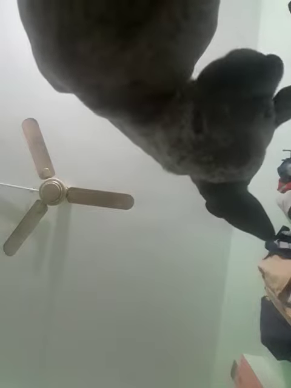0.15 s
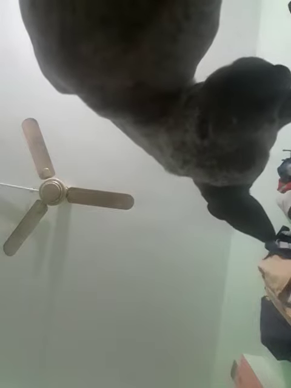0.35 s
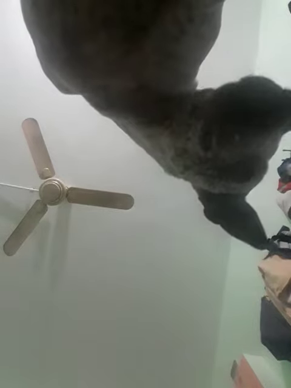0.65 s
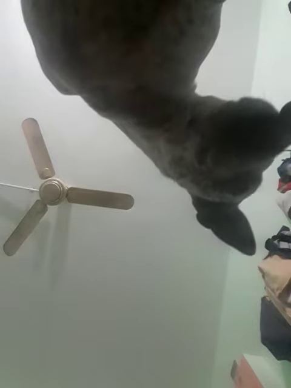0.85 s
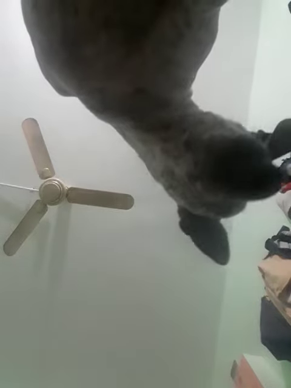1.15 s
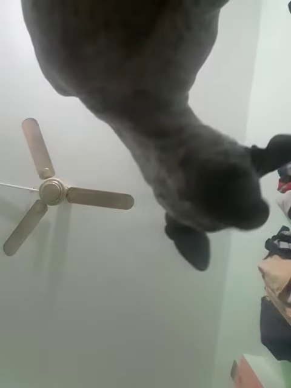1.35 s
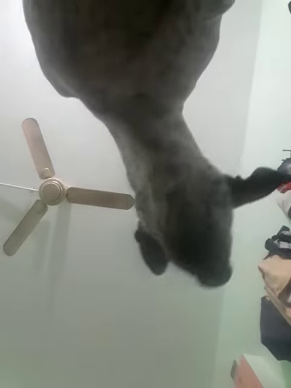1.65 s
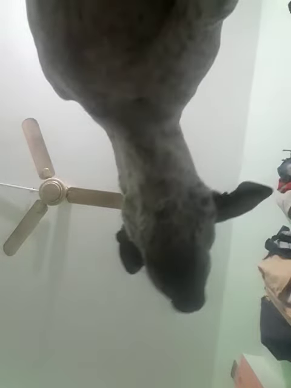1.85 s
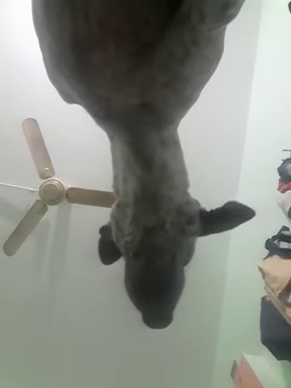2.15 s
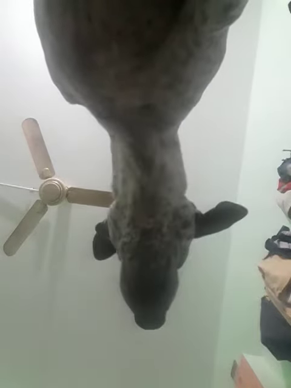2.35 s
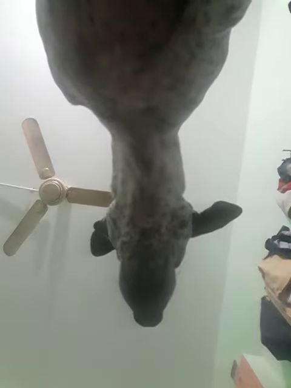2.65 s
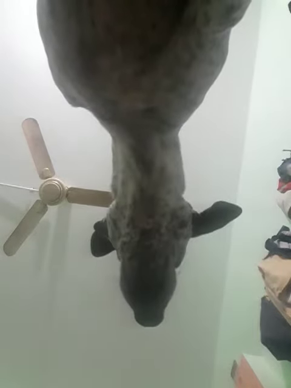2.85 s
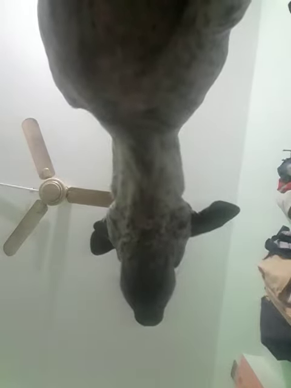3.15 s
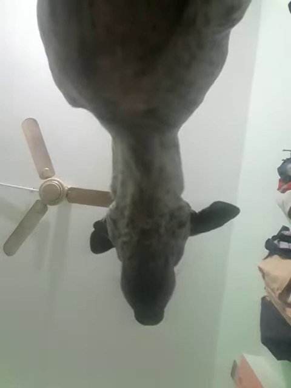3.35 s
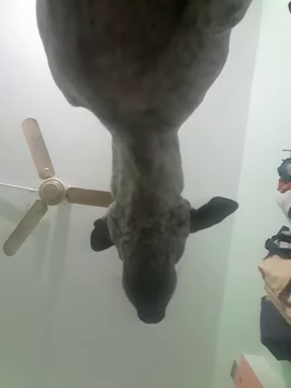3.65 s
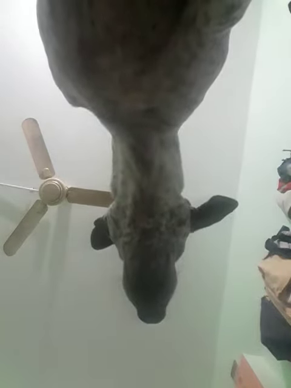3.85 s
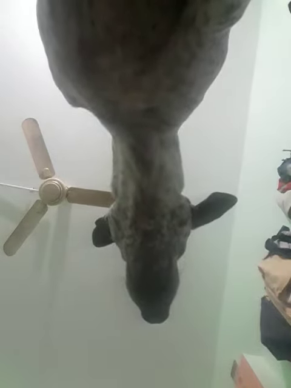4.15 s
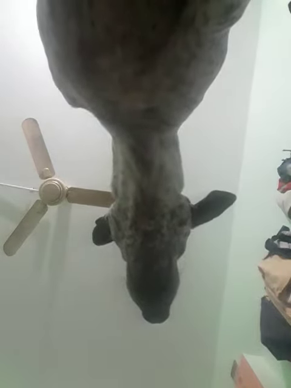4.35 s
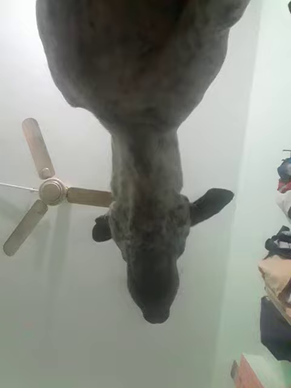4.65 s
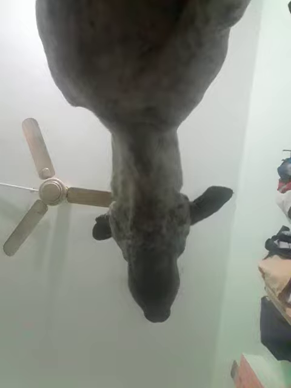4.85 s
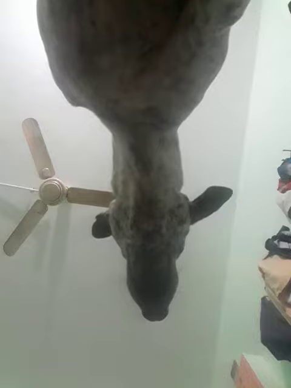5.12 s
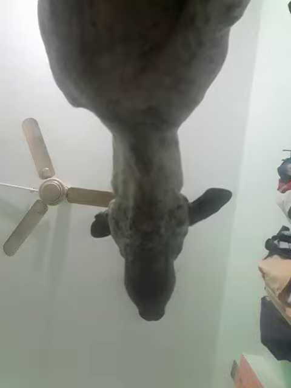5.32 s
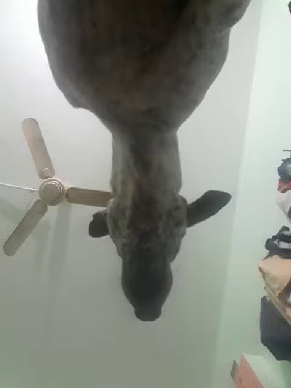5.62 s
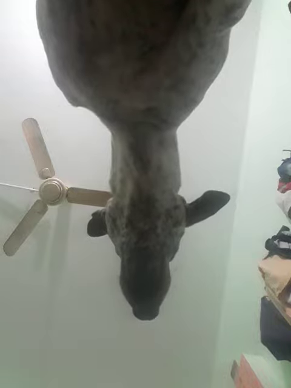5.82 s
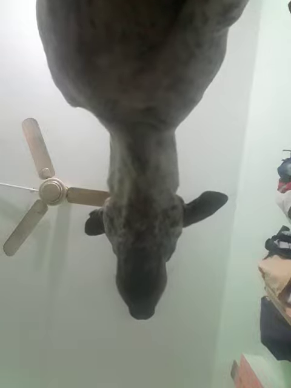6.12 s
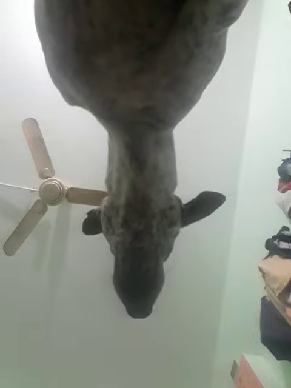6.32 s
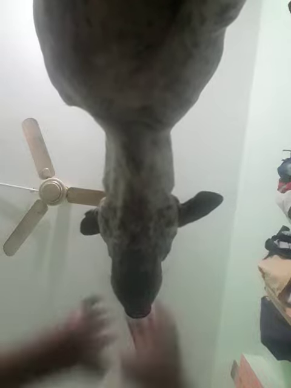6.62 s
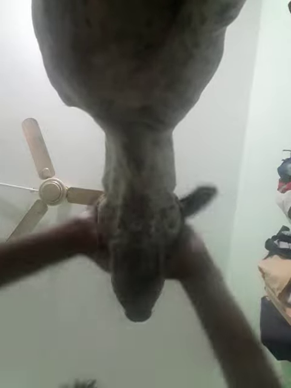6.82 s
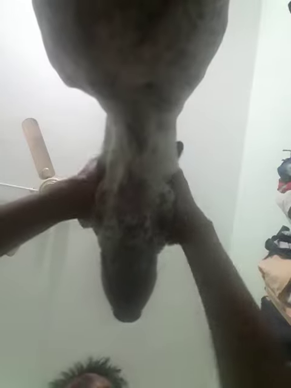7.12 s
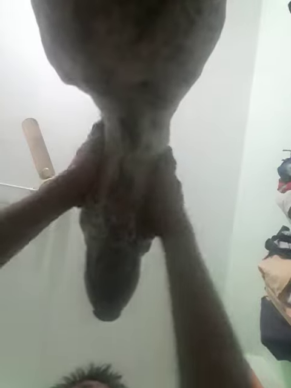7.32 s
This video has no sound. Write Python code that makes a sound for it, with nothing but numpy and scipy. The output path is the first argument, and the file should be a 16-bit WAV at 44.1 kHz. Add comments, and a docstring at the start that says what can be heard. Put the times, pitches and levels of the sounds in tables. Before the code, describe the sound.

In a bare room with a soft fan hum, joints pop and crack, something knocks distantly, and two palms rub fast before settling on fur.

```python
"""Knuckles crack, something thumps farther off, then two dry palms rub briskly and settle on a dog's short fur.
We listen close to a phone lying under the dog, in a bare room with a humming ceiling fan.
Cracks, ticks, pops and pats are short shaped pulses; rubbing and sliding are noise that swells with speed;
fuzzy gliding notes come from the hollow between the hands; the thump is a knock with fading tones and noise.
The room answers the hands with a ringing of noise that dies at its own speed for each frequency."""
import sys
import numpy as np
from scipy import signal
from scipy.fft import rfft, irfft, next_fast_len
from scipy.io import wavfile
from scipy.ndimage import uniform_filter1d, map_coordinates

SR = 44100
rng = np.random.default_rng(int(sys.argv[2]) if len(sys.argv) > 2 else 0)


def to_wav(sig):
    """Store sig (one row per channel, or 1-D mono) as 16-bit WAV at the path in sys.argv[1].

    Samples outside -1..1 are clipped; the rate is SR.
    """
    pcm = np.clip(np.atleast_2d(sig), -1, 1) * 32767
    pcm = np.round(pcm).astype(np.int16)
    wavfile.write(sys.argv[1], SR, pcm.T)  # frames by channels


N = 329868

# Steady tones of the fan. Each row: frequency in Hz, rms level in dB before it flutters.
FAN_TONES = [(58.5, -90), (81, -82), (101, -76), (199.5, -83.5), (296, -88), (314, -87.5), (565, -98)]
# Colour of the fan's air. Each row: frequency in Hz, relative level in dB.
FAN_AIR_COLOUR = [(25, -25.5), (45, -17), (65, -5), (95, -2.5), (125, -2.5), (160, -9), (290, -14),
                  (380, -18.5), (650, -21), (1000, -25.5), (3000, -32)]
# Colour of the microphone's own hiss. Each row: frequency in Hz, relative level in dB.
MIC_HISS_COLOUR = [(300, -16), (1200, 0.5), (5000, 0.5), (6200, 0.5), (6850, 13.5), (7250, 17), (7800, 8.5),
                   (9000, 5.5), (11000, 0), (15500, -1.5)]
# Colour of the air noise that differs between the channels. Each row: frequency in Hz, relative level in dB.
SIDE_AIR_COLOUR = [(25, -4), (90, -5.5), (200, -11), (500, -12.5), (1500, -19.5), (7000, -16),
                   (15000, -24.5)]
TOP_HZ = 15900  # nothing is kept above about this frequency

# How long the room rings. Each row: frequency in Hz, time to fall by 60 dB in seconds.
ROOM_FADE = [(150, .7), (400, 0.4), (900, 0.4), (2000, 0.4), (5000, 0.44), (9000, 0.44), (15000, 0.12)]
# Colour of the room's answer. Each row: frequency in Hz, relative level in dB.
ROOM_ANSWER_COLOUR = [(150, 4.5), (1000, 6), (3000, -1.5), (8000, -3), (15000, 0)]

# Soft distant scuffs. Each row: start in seconds, level in dB, centre frequency in Hz.
DISTANT_SCUFFS = [(0.282, -72.5, 440), (3.505, -78, 2620), (4.005, -59, 3500), (4.396, -67, 2890)]

THUMP_S = 3.9235  # start of the thump in seconds
# Tones of the thump. Each row: frequency in Hz, relative level in dB,
# time to fall by 60 dB in seconds before stretching.
THUMP_TONES = [(275, 3.5, 0.85), (504, 7, 0.56), (774, -3, 0.43), (740, -11, 0.27), (1114, -11, 0.35),
               (1430, -17, 0.33), (1615, -9, 0.63), (1696, -15, 0.24), (1879, -14, 0.17), (2200, -3, 0.41)]
# Colour of the thump's knock and noise. Each row: frequency in Hz, relative level in dB.
THUMP_COLOUR = [(60, -34), (120, -10), (190, -4), (280, 8), (380, -4), (520, 6.5), (680, -5.5),
                (1200, -7.5), (1650, -5), (2200, -8.5), (3300, -13.5), (5000, -18.5), (8000, -18),
                (15000, -31)]
# Loose parts ringing on. Each row: centre in Hz, width in Hz before widening, level in dB.
LOOSE_PARTS = [(1634, 92, -24.5), (2180, 89, -29), (3270, 300, -25)]

# Colour of skin friction. Each row: frequency in Hz, relative level in dB.
SKIN_COLOUR = [(70, 6.5), (160, -1.5), (300, -12), (450, -7), (1000, -12), (2800, -3.5), (4400, -4),
               (6500, 0.5), (8500, 2), (10000, -2), (12500, -0.5), (15500, -6.5)]
# Single slides and brushes. Each row: middle in seconds, half of the whole swell in seconds,
# level in dB at full speed, lower edge in Hz before a small shift down, brightness in dB per octave above it.
SINGLE_SLIDES = [(.0, 0.26, -62.5, 890, -3), (.2, .46, -67.5, 3000, -.5), (0.509, 0.13, -65, 1600, -3.5),
                 (.548, .085, -57.5, 4140, -7), (1.125, .28, -66, 6400, -5), (1.55, .052, -66.5, 1200, -6),
                 (1.677, .13, -53.5, 2000, -3.5), (2.86, .23, -56, 2900, -.8),
                 (3.05, .02, -49.5, 2400, -16), (4.028, .055, -44.5, 3020, -0.5),
                 (4.095, .21, -57.5, 4040, -4), (5.06, .17, -61.5, 6800, 0),
                 (5.197, 0.098, -50.5, 4000, 5.5), (6.416, .073, -47, 2010, -1.5),
                 (7.388, .3, -62, 3600, -2)]
# Air squeezed out between gripping fingers. Each row: middle in seconds, half of the whole swell in seconds,
# level in dB, middle note in Hz, glide in octaves from the middle to either end.
FINGER_SQUEAKS = [(.74, .12, -76, 1900, .45), (2.822, .1, -66, 3250, .1), (2.94, .04, -63.5, 3300, -.1)]

POP_S = 1.221  # start of the hollow pop in seconds
# Rings of the pocket between cupped hands. Each row: centre in Hz, width in Hz before narrowing, level in dB.
POP_RINGS = [(827, 140, 2), (376.5, 640, -10.5), (2220, 400, -13.5), (4540, 1400, -9.5),
             (6840, 3100, -15.5), (9000, 900, -8.5), (12300, 3500, -24), (1420, 570, -20)]

# Colour of the bare snap of a contact. Each row: frequency in Hz, relative level in dB.
SNAP_COLOUR = [(100, -3), (300, -9), (750, -7.5), (1200, -1), (2200, -0.5), (5000, 0.5), (8500, -2),
               (11000, -5), (15500, -3)]
# Joint cracks and small ticks of contact. Each row: start in seconds, level in dB, ring in Hz,
# ring width in Hz, upper ring in dB, snap in dB, lower edge in Hz, upper edge in Hz, room answer in dB.
CRACKS_AND_TICKS = [(1.645, -17, 4270, 1498, -12, -6, 1000, 9000, -1),
                    (1.659, -10, 2120, 1200, -14.5, -5.5, 950, 7500, -8.5),
                    (1.7384, 0, 3600, 700, -20.5, -7.5, 880, 10000, -6),
                    (1.7655, 18, 3330, 480, -17, -19.5, 440, 10000, -10.5),
                    (1.8028, 15, 3840, 900, -6.5, -14, 221, 10200, -6.5),
                    (1.8175, 17, 3960, 634, -12.5, -21, 199.3, 7000, -25),
                    (1.924, 11, 4420, 900, -1.5, -9.5, 252, 9000, -8.5),
                    (2.574, -16.5, 8700, 1400, -12, -19, 700, 14100, -5),
                    (2.789, -18.5, 3340, 899, 8, -8, 2674, 13800, -13),
                    (2.887, 6.5, 8800, 800, -15, -26, 2600, 15000, -13),
                    (2.9658, 4.5, 1750, 1200, -25, -14, 1100, 17000, -6),
                    (3.091, -10.5, 2920, 900, -14, -4.5, 1088, 8500, -4),
                    (3.1224, -8.5, 2900, 897, -14.5, -4.5, 1060, 8200, -7),
                    (3.1595, -5, 6200, 1300, -14, -4, 960, 12000, 2),
                    (3.1619, 4.5, 3040, 704, 2.5, 1, 1135, 17130, -5.5),
                    (5.1405, -23, 6800, 2500, -5, -7, 1000, 17000, -1),
                    (7.063, -19, 4600, 2500, 3, -15, 400, 12000, -4.5)]
UPPER_RING_HZ, UPPER_Q = 8430, 5  # the upper ring that all cracks and ticks share, and its sharpness

# The palms bump as they pass. Each row: start in seconds, level in dB, ring of the hollow in Hz.
PALM_PATS = [(5.372, -13, 1190), (5.402, -10, 2600), (5.505, -7, 2080), (5.609, -16.5, 910),
             (5.64, -16, 400), (5.6611, -5.5, 990), (5.734, -9, 695), (5.89, -11, 1590),
             (5.895, -13.5, 536), (6.142, -12.5, 1500)]
PAT_Q, PAT_TOP_HZ = 3.2, 8240  # sharpness of the hollow's ring; upper edge of a pat
FLESH_HZ, FLESH_WIDTH_HZ, FLESH_DB = 262, 570, -11.5  # the dull push of the flesh

# To-and-fro of the palms. Each row: middle in seconds, half of the whole swell in seconds, level in dB,
# brightness in dB per octave, opening note in Hz, its glide in octaves from the middle to either end,
# opening note in dB and closing note in dB, both relative to the level.
PALM_STROKES = [(5.254, 0.13, -43, -1.7, 1600, -0.36, -20, -7),
                (5.376, .108, -34.5, -2.5, 2350, .75, -8.5, -18),
                (5.5, .1, -32, -0.5, 1480, -.45, -16, -12),
                (5.613, .125, -32.5, -.5, 2746, .15, -11, -11.5),
                (5.756, .125, -35, -3, 2650, 0.26, -22, -21),
                (5.867, .135, -34, -1.5, 2820, -.05, -12, -19),
                (6.002, .08, -30.5, 0, 3200, -0.1, -25, -27),
                (6.116, .087, -31.5, -.5, 3150, -0.12, -14, -20),
                (6.251, 0.13, -35.5, -2, 2300, -.25, -20, -20), (6.361, .095, -36, -.6, 2600, .3, -11, -22)]
PALM_EDGE_HZ, EDGE_FOLLOWS = 2400, 0.49  # reference edge of the hiss; how far the edge follows the opening note
NOTE_LEAD_S, NOTE_HALF_S = .016, .038  # opening note comes this early; half the span of either note
CLOSING_LAG_S, CLOSING_HZ, CLOSING_GLIDE_OCT = .027, 3200, .55  # the shrinking hollow chirps upward


def amp(db):
    """Turn dB into a gain."""
    return 10 ** (np.asarray(db) / 20)


def unit(x):
    """Scale a sound to an average strength (rms) of 1."""
    return x / np.sqrt(np.mean(x ** 2) + 1e-20)


def along(points, hz):
    """Read a curve of (Hz, value) points, evenly by pitch."""
    f, v = np.transpose(points)
    return np.interp(np.log(hz + 1), np.log(f + 1), v)


def add(track, s, x):
    """Mix a sound into the track from second s on, cutting what falls outside."""
    i = round(s * SR)
    x = x[max(-i, 0):N - i]
    track[max(i, 0):][:len(x)] += x


def wobble(rate, size):
    """A smooth random curve with so many random points a second."""
    knots = rng.standard_normal(int(size * rate / SR) + 4)
    return map_coordinates(knots, [np.arange(size) * rate / SR])


def filtered(x, response):
    """Change the strength of each frequency by a given response."""
    m = next_fast_len(len(x) + 8192)
    return irfft(rfft(x, m) * response(np.fft.rfftfreq(m, 1 / SR)), m)[:len(x)]


def noise(spectrum, size):
    """Random hiss coloured by a table, at rms 1."""
    return unit(filtered(rng.standard_normal(size), lambda hz: amp(along(spectrum, hz))))


def resonance(hz, centre, width):
    """Power of one resonance: strongest at its centre, weaker to both sides."""
    return (hz * width) ** 2 / ((centre ** 2 - hz ** 2) ** 2 + (hz * width) ** 2)


def band(hz, low_hz, high_hz, leak_db=-27):
    """Gain of a contact: a steep, slightly leaky lower edge and a gentle upper one."""
    lower = amp(leak_db) + 1 / np.sqrt(1 + (low_hz / (hz + 1)) ** 12)
    return lower / np.sqrt(1 + (hz / high_hz) ** 6)


def dying(spectrum, t60s, size=SR):
    """Diffuse ringing of total energy 1, each frequency dying at its own speed."""
    hz, t, z = signal.stft(noise(spectrum, size), SR, nperseg=256)
    fade = amp(-60 * t / along(t60s, hz)[:, None])
    tail = signal.istft(z * fade, SR, nperseg=256)[1][:size]
    return tail / np.linalg.norm(tail)


def room(x, gap=0.006):
    """The bare walls answer after a short gap, in seconds."""
    tail = dying(ROOM_ANSWER_COLOUR, ROOM_FADE)
    fade_in = np.clip(np.arange(len(tail)) / (gap * SR) - .5, 0, 1)
    return signal.fftconvolve(x, tail * fade_in)


def impact(power, spread=0.0012, size=4096):
    """A pulse with the given power spectrum, scattered for a moment."""
    # folding the cepstrum packs the pulse's energy at its start
    cepstrum = irfft(np.log(power(np.fft.rfftfreq(size, 1 / SR)) + 1e-12) / 2)
    cepstrum[1:size // 2] *= 2
    cepstrum[size // 2:] = 0
    scatter = rfft(rng.standard_normal(size) * np.exp(-np.arange(size) / (spread * SR)))
    # even out the scatter so that it keeps the overall colour
    scatter /= np.sqrt(np.abs(uniform_filter1d(np.abs(scatter) ** 2, size=50)))
    return irfft(np.exp(rfft(cepstrum)) * scatter)[:size // 2]


def contact(start_s, pulse, room_db, bounce_db=-10, bounce_s=.0037):
    """A pulse in the room: the floor returns it almost at once, the walls later."""
    out = np.zeros(N)
    add(out, start_s, pulse)
    add(out, start_s + bounce_s, amp(bounce_db) * pulse)
    add(out, start_s, amp(room_db) * room(pulse))
    return out


def swell(length, sharpness):
    """Speed of one stroke over twice its length: a bell with soft skirts."""
    return np.exp(-np.abs(np.linspace(-3, 3, int(2 * length * SR))) ** sharpness)


def patchy(x, depth_db, across=8, along_time=9):
    """Changing contact tints the hiss with drifting patches of colour."""
    z = signal.stft(x, nperseg=256)[2]
    field = rng.standard_normal(z.shape)
    for _ in range(2):
        field = uniform_filter1d(field, round(across), axis=0)
        field = uniform_filter1d(field, round(along_time), axis=1)
    return signal.istft(z * amp(depth_db * unit(field)), nperseg=256)[1][:len(x)]


def friction(length, edge_hz, tilt_db, sharpness, catch_db=1.5, patchy_db=2, leak_db=-25):
    """Skin ridges catch and slip in a dense hiss that follows the speed of the hand."""
    speed = swell(length, sharpness)
    size = len(speed)
    uneven = rng.standard_normal(size) * amp(catch_db * wobble(160, size))
    slips = patchy(uneven, patchy_db)

    def colour(hz):
        low_cut = amp(leak_db) + hz ** 4 / (hz ** 4 + (.85 * edge_hz) ** 4)
        octaves_above = np.log2(np.maximum(hz, edge_hz) / edge_hz)
        return low_cut * amp(along(SKIN_COLOUR, hz) + tilt_db * octaves_above)

    return speed * unit(filtered(slips, colour))


def whistle(length, note_hz, glide_oct, width_hz=300, sharpness=2.7):
    """The hollow between the hands colours the escaping air with a gliding, fuzzy note."""
    flow = swell(length, sharpness)
    size = len(flow)
    pitch = note_hz * 2 ** (glide_oct * np.linspace(-1, 1, size))
    phase = 2 * np.pi * np.cumsum(pitch) / SR
    # two random strengths blur the pure tone
    return flow * unit(wobble(width_hz, size) * np.cos(phase) + wobble(width_hz, size) * np.sin(phase))


def fan(air_db=-73, waver=.35, flutter_db=3.0):
    """The ceiling fan hums unsteadily over the low rush of its blades."""
    t = np.arange(N) / SR
    hum = np.zeros(N)
    for hz, db in FAN_TONES:
        level = amp(db + flutter_db * wobble(5, N)) * np.sqrt(2)
        hum += level * np.sin(2 * np.pi * hz * t + waver * wobble(7.9, N))
    return hum + amp(air_db) * noise(FAN_AIR_COLOUR, N)


def microphone_hiss(hiss_db=-74, waver_db=-3.0):
    """The microphone's own hiss, slowly drifting in level."""
    return amp(hiss_db + waver_db * wobble(3.8, N)) * noise(MIC_HISS_COLOUR, N)


def scuffs(rise_s=0.0022, t60=0.45, q=1.55):
    """Soft scuffs farther off: bands of noise that swell quickly and fade with the room."""
    out, t = np.zeros(N), np.arange(SR) / SR
    for s, db, centre_hz in DISTANT_SCUFFS:
        hiss = unit(filtered(rng.standard_normal(SR), lambda hz: resonance(hz, centre_hz, centre_hz / q)))
        add(out, s, amp(db) * hiss * (1 - np.exp(-t / rise_s)) * amp(-60 * t / t60))
    return out


def thump(body_db=-10, modes_db=-15, knock_db=-22, waver=0.66, rise_s=0.0048, stretch=1.12, rattle_t60=0.81):
    """A distant blow on something wooden: a weak direct knock, then the room and a rattle that lingers."""
    out, t = np.zeros(N), np.arange(SR) / SR
    ring = np.zeros(SR)
    for hz, db, t60 in THUMP_TONES:
        fade = amp(db - 60 * t / (stretch * t60))
        ring += fade * np.sin(2 * np.pi * hz * t + waver * wobble(39.5, SR))
    ring /= np.linalg.norm(ring)
    # points of (Hz, time to fall by 60 dB in seconds)
    body = dying(THUMP_COLOUR, [(200, 1.0), (600, 0.73), (2000, 0.45), (10000, 1.0)])
    add(out, THUMP_S, (amp(modes_db) * ring + amp(body_db) * body) * (1 - np.exp(-t / rise_s)))
    knock = impact(lambda hz: amp(along(THUMP_COLOUR, hz)) ** 2)
    add(out, THUMP_S, amp(knock_db) * knock / np.linalg.norm(knock))
    for centre, width, db in LOOSE_PARTS:
        rattle = filtered(rng.standard_normal(SR), lambda hz: resonance(hz, centre, 1.6 * width))
        rattle *= amp(-60 * t / rattle_t60)
        add(out, THUMP_S, amp(db) * rattle / np.linalg.norm(rattle))
    return out


def sliding(sharpness=2.2):
    """Hands slide between the cracks and squeeze out air, something brushes after the thump,
    the last palm stroke trails off, and fur is stroked."""
    out = np.zeros(N)
    for s, length, db, edge_hz, tilt_db in SINGLE_SLIDES:
        add(out, s - length, amp(db) * friction(length, edge_hz, tilt_db, sharpness))
    for s, length, db, note_hz, glide_oct in FINGER_SQUEAKS:
        add(out, s - length, amp(db) * whistle(length, note_hz, glide_oct))
    return out


def pop(level_db=-1, room_db=-3.5, dull_hz=8000):
    """The air pocket between cupped hands rings briefly; mostly its low note carries into the room."""
    out = np.zeros(N)

    def power(hz):
        return sum(amp(db) ** 2 * resonance(hz, centre, 0.88 * width) ** 2 for centre, width, db in POP_RINGS)

    pulse = amp(level_db) * impact(power)
    add(out, POP_S, pulse)
    add(out, POP_S, amp(room_db) * filtered(room(pulse), lambda hz: 1 / (1 + (hz / dull_hz) ** 2)))
    return out


def cracks_and_ticks(spread=.0016):
    """Each crack or tick is a broad snap with two short rings: its own and a shared upper one."""
    out = np.zeros(N)
    for s, db, ring_hz, width_hz, upper_db, snap_db, low_hz, high_hz, room_db in CRACKS_AND_TICKS:
        def power(hz):
            own_ring = resonance(hz, ring_hz, width_hz) ** 2
            upper_ring = amp(upper_db) ** 2 * resonance(hz, UPPER_RING_HZ, UPPER_RING_HZ / UPPER_Q) ** 2
            snap = amp(snap_db + along(SNAP_COLOUR, hz)) ** 2
            return (own_ring + upper_ring + snap) * band(hz, low_hz, high_hz) ** 2

        out += contact(s, amp(db) * impact(power, spread), room_db)
    return out


def pats(snap_db=-8, low_hz=90, room_db=-6, spread=0.0028):
    """A soft bump of the palms pushes the flesh and rings the hollow between them."""
    out = np.zeros(N)
    for s, db, hollow_hz in PALM_PATS:
        def power(hz):
            hollow = resonance(hz, hollow_hz, hollow_hz / PAT_Q) ** 2
            flesh = amp(FLESH_DB) ** 2 * resonance(hz, FLESH_HZ, FLESH_WIDTH_HZ) ** 2
            snap = amp(snap_db + along(SNAP_COLOUR, hz)) ** 2
            return (hollow + flesh + snap) * band(hz, low_hz, PAT_TOP_HZ) ** 2

        out += contact(s, amp(db) * impact(power, spread), room_db)
    return out


def rubbing(sharpness=2.19):
    """Every pass of the palms hisses, and the hollow sounds once as it opens and once as it closes."""
    out = np.zeros(N)
    for s, length, db, tilt_db, note_hz, glide_oct, opening_db, closing_db in PALM_STROKES:
        edge_hz = PALM_EDGE_HZ * (note_hz / PALM_EDGE_HZ) ** EDGE_FOLLOWS
        add(out, s - length, amp(db) * friction(length, edge_hz, tilt_db, sharpness))
        opening = whistle(NOTE_HALF_S, note_hz, glide_oct)
        add(out, s - NOTE_LEAD_S - NOTE_HALF_S, amp(db + opening_db) * opening)
        closing = whistle(NOTE_HALF_S, CLOSING_HZ, CLOSING_GLIDE_OCT)
        add(out, s + CLOSING_LAG_S - NOTE_HALF_S, amp(db + closing_db) * closing)
    return out


def scene(rub_room_db=-8, side_db=-86, unlike_db=-41):
    """Hands, thump and fan reach both channels alike; only a trace of air noise and echo differs."""
    hands = rubbing() + sliding()
    hands_in_room = hands + amp(rub_room_db) * room(hands)[:N]
    sounds = hands_in_room + cracks_and_ticks() + pats() + pop() + thump() + scuffs()
    mid = sounds + fan() + microphone_hiss()
    side = amp(side_db) * noise(SIDE_AIR_COLOUR, N) + amp(unlike_db) * room(sounds)[:N]
    return np.array([mid + side, mid - side])


def record(dry, bass_hz=42):
    """The phone rolls off the deep bass and keeps nothing above its band limit."""
    def response(hz):
        bass_cut = hz ** 2 / np.hypot(hz ** 2, bass_hz ** 2)
        return bass_cut * np.clip((TOP_HZ - hz) / 200 + .5, 0, 1)

    return np.array([filtered(x, response) for x in dry])


dry = scene()
out = record(dry)
to_wav(out)
```